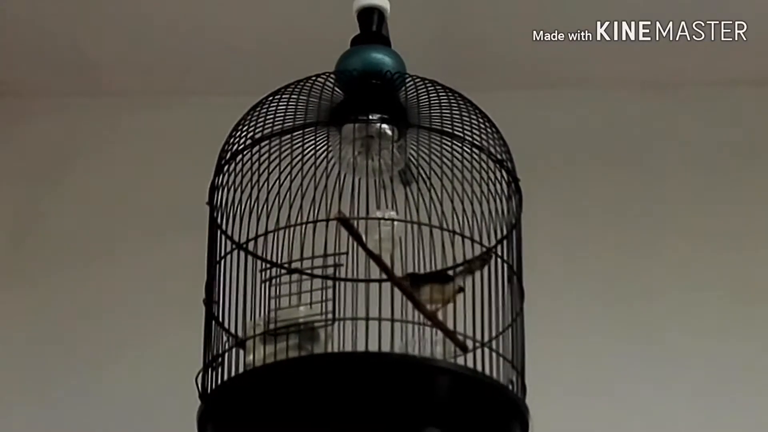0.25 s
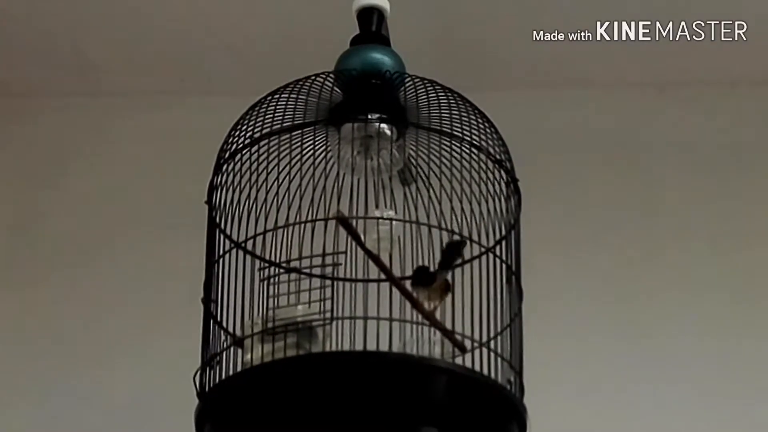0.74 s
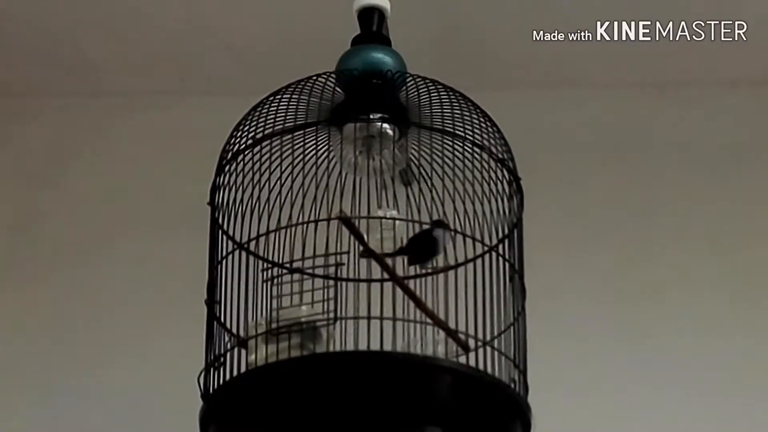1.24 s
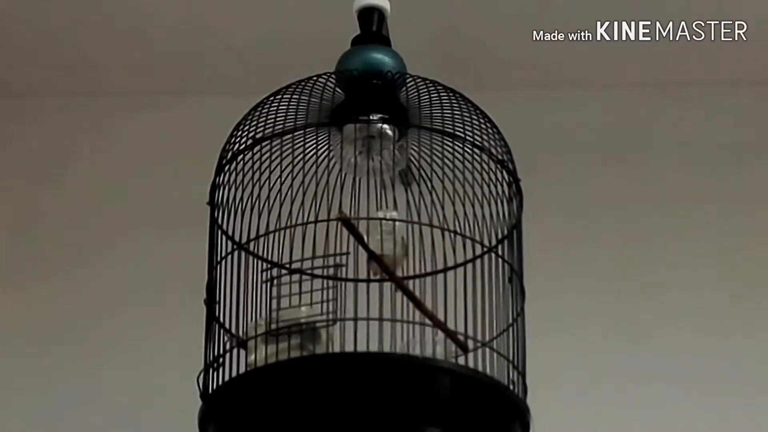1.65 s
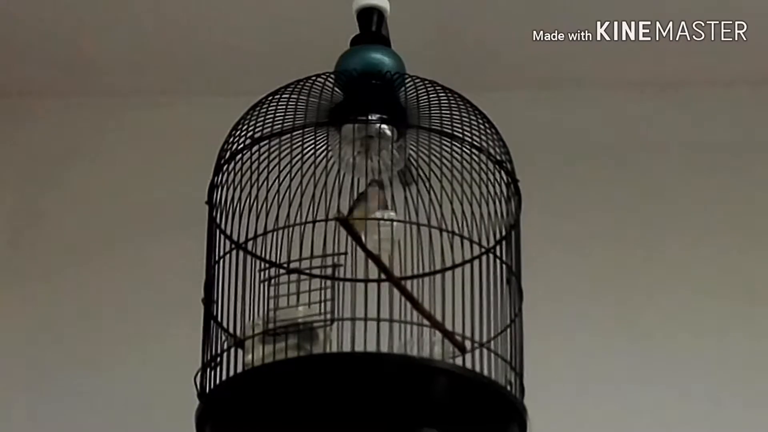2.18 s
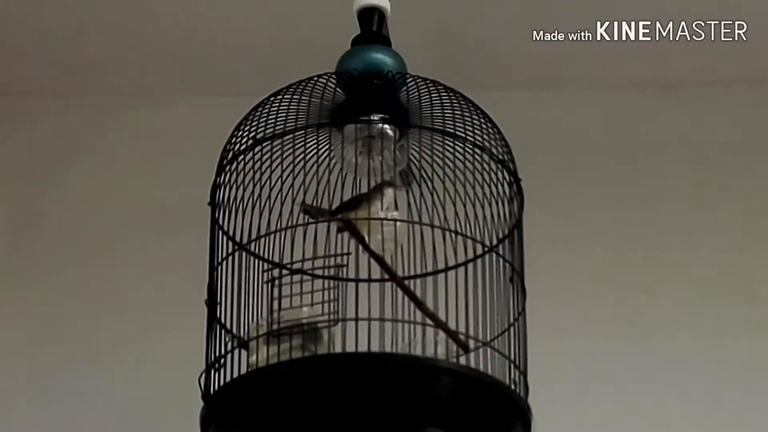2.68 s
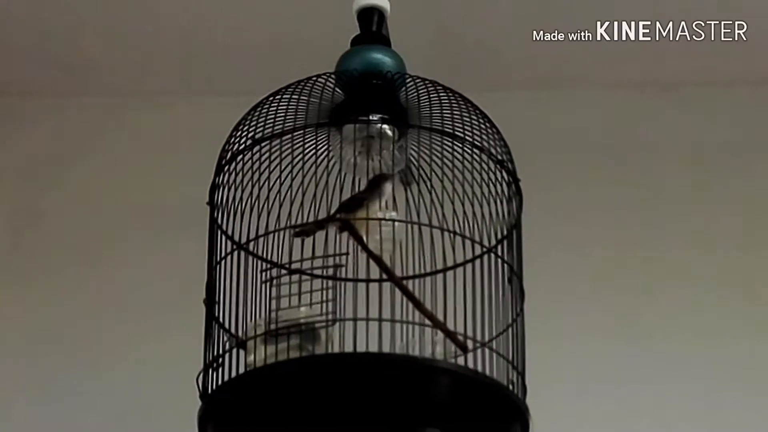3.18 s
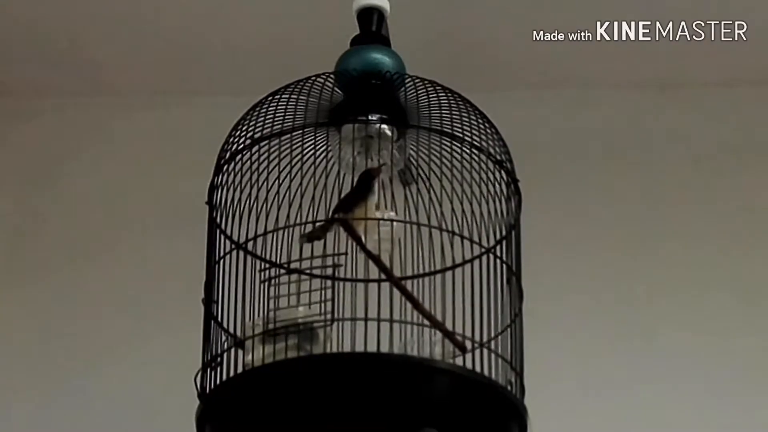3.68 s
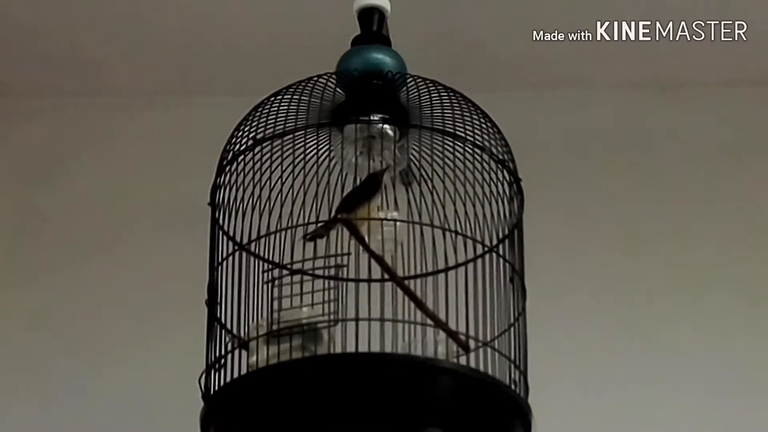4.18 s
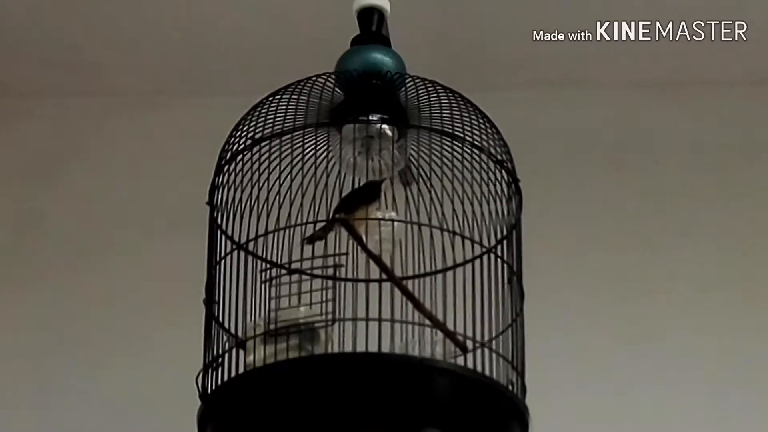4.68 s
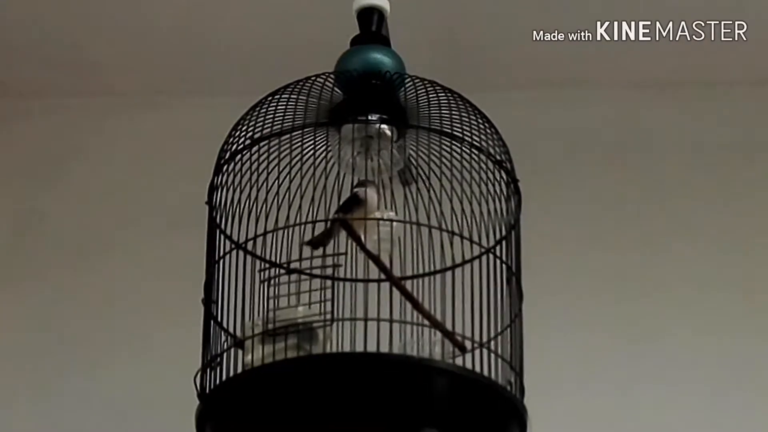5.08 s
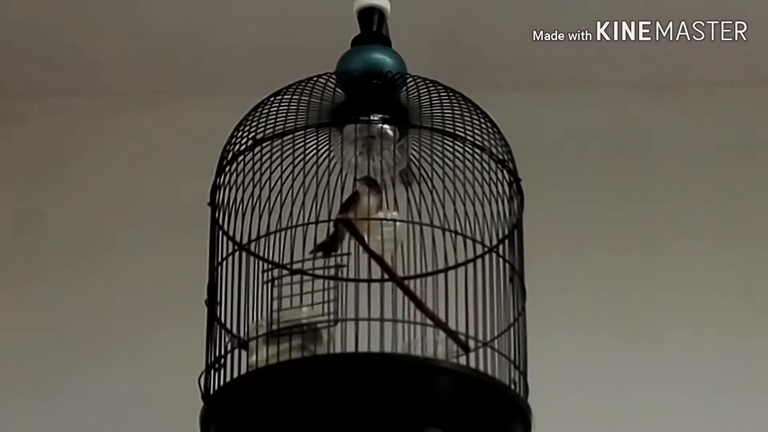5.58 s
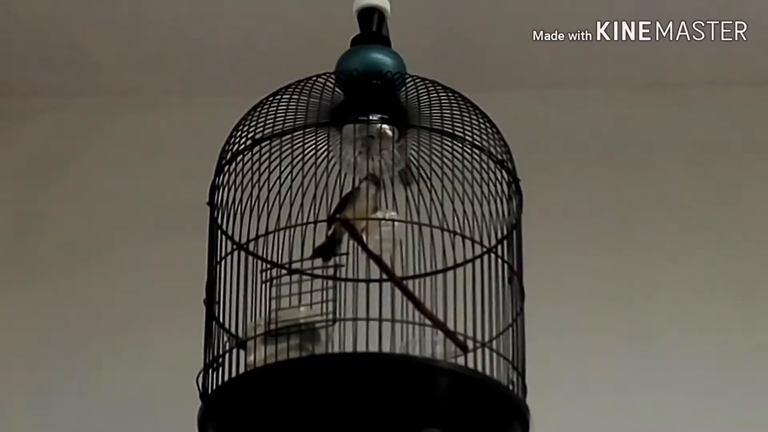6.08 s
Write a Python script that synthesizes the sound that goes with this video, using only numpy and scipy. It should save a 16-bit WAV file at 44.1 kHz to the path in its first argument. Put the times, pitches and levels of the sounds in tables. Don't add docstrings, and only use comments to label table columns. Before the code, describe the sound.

Piercing two-part bird whistles, overloaded and close, ring through a bare room over low rumble; distant falling chirps fill the pauses.

```python
import sys
import numpy as np
from scipy import signal
from scipy.fft import rfft, irfft, next_fast_len
from scipy.io import wavfile
from scipy.ndimage import uniform_filter1d, map_coordinates

SR = 44100
rng = np.random.default_rng(int(sys.argv[2]) if len(sys.argv) > 2 else 0)


def unload_wav(signal):
    wavfile.write(
        sys.argv[1],
        SR,
        np.round(np.clip(np.atleast_2d(signal).T, -1, 1) * 32767).astype(np.int16),
    )


def magnitude_from_level(level_db):
    exponent = np.asarray(level_db, float) / 20
    return 10 ** exponent


N = 279594
LEAD = SR // 10

# f/Hz, level/dB per Hz
RUMBLE_SPECTRUM = [(12, -52), (20, -31), (32, -35), (60, -4.5), (195, -7.5), (300, -7.5), (326, -14.5),
                   (536, -13.5), (1200, -25), (1560, -64.5), (2640, -120)]
# f/Hz, level/dB per Hz
HISS_SPECTRUM = [(350, -30), (600, -12), (900, -10.5), (1400, -8.5), (2500, -10.5), (3600, -7), (6200, -7),
                 (7500, -20), (9000, -19.5), (9600, -15), (10300, -23.5), (13000, -24.5), (15000, -25),
                 (15800, -26.5)]
# f/Hz, likeness/1
LIKENESS = [(60, 0.77), (180, 0.8), (550, 0.72), (1650, 0.36), (4970, 0.11), (15000, 0.97)]
# f/Hz, width/Hz, level/dB
DRONE_PEAKS = [(194, 15, -2.5), (304, 2, 0.5)]
# f/Hz, width/Hz, level/dB
INSECT_PEAKS = [(4600, 120, -3.5), (4200, 500, -7), (5900, 220, -12.5)]
# f/Hz, t60/s
ROOM_T60 = [(1000, 0.67), (2000, 0.29), (3000, 0.42), (4300, 0.29), (6000, 0.28), (10000, 0.18)]
# delay/s, level/dB
WALL_ECHOES = [(.0012, -7), (.0027, -2), (.0046, -5.5), (.0071, -6), (0.0092, -6.5), (0.015, -6.5)]
# f/Hz, level/dB, t60/s
WIRE_MODES = [(1020, -16.5, 0.18), (1504, 5.5, 0.07), (1582, -9, 0.98), (2230, -12, 0.12),
              (2420, -12.5, 0.55), (4474, -23, 0.44), (5700, -13, 0.48), (5750, -8.5, 0.17),
              (6700, -18, 0.32), (6800, -13.5, 0.17), (6970, -15, 0.21), (7160, -5, 0.15),
              (7260, -14, 0.14), (8791, -6, 0.096), (9060, -18.5, 0.11)]
# t/s, level/dB
HOP = (1.136, -38)
# t/s, peak level/dB
CLAW_TICKS = [
    (1.5975, -31),
    (5.6068, -25),
    (5.6325, -40),
]
# t/s, level/dB, start f/Hz, end f/Hz, length/s
DISTANT_PEEPS = [(0.134, -43.5, 1860, 1690, 0.027), (.18, -29.5, 1240, 1100, 0.0033),
                 (-.02, -43, 1460, 1490, 0.028), (.245, -49.5, 1410, 1480, 0.053),
                 (1.483, -59, 5770, 4300, 0.026), (1.63, -48.5, 1530, 1497, 0.092),
                 (1.703, -43, 1955, 1296, 0.036), (1.735, -45, 5140, 4070, 0.055),
                 (1.765, -44, 2830, 3718, 0.046), (4.296, -55, 1047, 1130, 0.044),
                 (4.49, -42.5, 6780, 6680, 0.062), (4.533, -57, 1324, 1235, .06),
                 (4.579, -54.5, 1830, 1813, 0.024), (5.05, -59, 1372, 1420, 0.059),
                 (5.95, -55.5, 1025, 1094, 0.046), (6.029, -47, 1890, 1790, 0.03)]
# t/s, start level/dB, end level/dB, end f/Hz, length/s
FAR_CALLS = [
    (-.045, -12, -16.5, 3232, 0.06),
    (1.863, -7, -27.5, 3086, 0.082),
    (2.188, -22.5, -14, 3240, 0.074),
    (5.339, -39.5, -32, 3210, 0.079),
    (5.665, -36.5, -22, 3270, 0.066),
    (5.963, -35.5, -21, 3210, 0.062),
]
# t/s, start level/dB, end level/dB, start f/Hz
FAR_REPLIES = [
    (2.057, -8.5, -37.5, 4474),
    (2.363, -25.5, -34, 4360),
    (5.206, -28, -42.5, 4600),
    (5.535, -20, -44, 4343),
    (5.821, -40.5, -35.5, 3464),
    (6.126, -43.5, -38, 3470),
]
# share of length/1, share of fall/1, level/dB
CALL_COURSE = [(0, .04, -8.5), (0.121, 0.055, 4.5), (0.24, .25, -1.5), (.37, 0.66, -1.5), (.5, .9, -6.5),
               (.62, 0.98, -4.5), (1, 0.95, -0.5)]
# share of length/1, share of fall/1, level/dB
REPLY_COURSE = [(0, 0, -12), (.25, .58, -7), (.33, .655, 0), (.62, .68, 0), (.72, .76, -8), (1, 1, -7)]
# t/s, level/dB, start f/Hz, end f/Hz, length/s
SONG_EXTRAS = [
    (.329, -18, 5050, 5000, .011),
    (6.208, -23, 2300, 1700, .035),
]
# t/s, fall level/dB, fall start f/Hz, rise delay/s, rise end f/Hz
SONG_NOTES = [
    (.340, 0.5, 5343, .072, 5920),
    (0.634, -0.5, 5596, 0.071, 5960),
    (2.431, 0.5, 5337, 0.072, 6390),
    (2.696, 0, 5700, 0.075, 6130),
    (2.958, 0.5, 5970, 0.075, 6100),
    (3.223, -0.5, 5764, 0.075, 5900),
    (3.495, -1, 6044, 0.068, 6120),
    (3.765, -0.5, 6040, 0.073, 6085),
    (6.167, -1.5, 4990, 0.081, 4880),
]
# f/Hz, level/dB
THROAT_GAIN = [(1700, -26.5), (2200, -19), (2700, -19.5), (3200, -7), (4000, -2), (4800, -0.5),
               (5500, -4.5), (6200, -11.5)]

RUMBLE_DB, HISS_DB = -46.5, -51
PRESS_DB_PER_S, RECOVER_DB_PER_S, HOLD_S, START_DB = 7.5, 6, 0.4, -6
GATE_DB, GATE_SHUTS_DB, GATE_SPAN_DB = 5.5, -4.5, 3
CALL_FROM_HZ, REPLY_TO_HZ, REPLY_S = 5840, 2120, .064
SAG_FROM_HZ, SAG_HZ_PER_S, DROP_HZ, DROP_S, FALL_S = 4520, 41000, 480.1, .0098, .068
RISE_FROM_HZ, RISE_TO_HZ, CLIMB_S, CLIMB_CURVE, REST_S = 2937, 6614, .042, 1.25, .0033
RISE_DB, RISE_FADE_DB = -9, 5.5


def unit(x):
    return x / np.sqrt(np.mean(x ** 2) + 1e-20)


def along(points, hz):
    f, value = np.transpose(points)
    return np.interp(np.log(hz + 1), np.log(f + 1), value)


def filtered(x, response):
    size = next_fast_len(N + SR // 2)
    return irfft(rfft(x, size) * response(np.fft.rfftfreq(size, 1 / SR)), size)[..., :N]


def resonant(x, peaks):
    def response(f):
        return sum(magnitude_from_level(db) * 1j * f * width / (c * c - f * f + 1j * f * width) for c, width, db in peaks)
    return unit(filtered(x, response))


def wobble(rate_hz):
    knots = rng.standard_normal(int(N * rate_hz / SR) + 4)
    return map_coordinates(knots, [np.arange(N) * rate_hz / SR])


def noise(spectrum):
    def mid_side(hz):
        turn = np.arccos(np.clip(along(LIKENESS, hz), -1, 1)) / 2
        return magnitude_from_level(along(spectrum, hz)) * [np.cos(turn), np.sin(turn)]
    mid, side = filtered(rng.standard_normal((2, N)), mid_side)
    return unit(np.array([mid + side, mid - side]))


def echoes(lumpy_db):
    hz, t, z = signal.stft(rng.standard_normal((2, 3 * SR // 4)), SR, nperseg=512)
    modes_db = lumpy_db * rng.standard_normal((len(hz), 1)) * np.minimum(t / .039, 1)
    fall_db = 60 * t / along(ROOM_T60, hz)[:, None]
    decay = np.hypot(magnitude_from_level(-fall_db), magnitude_from_level(-24.5 - .52 * fall_db))
    tail = signal.istft(z * magnitude_from_level(modes_db) * decay, SR, nperseg=512)[1]
    tail *= 1 - np.exp(-np.arange(tail.shape[1]) / (.0067 * SR))
    return tail / np.sqrt(np.mean(np.sum(tail ** 2, axis=1)))


def add(out, s, sound, tail, wet_db, lag, pan_db):
    path = magnitude_from_level(wet_db) * tail
    delay_s, db = np.transpose(WALL_ECHOES)
    arrive = np.round(delay_s * SR * rng.uniform(.85, 1.15, len(db))).astype(int)
    size = magnitude_from_level(db) * rng.choice([-1, 1], len(db))
    path[0, arrive] += size
    path[1, arrive + rng.integers(-2, 3, len(db))] += size
    path[0, max(lag, 0)] += 1
    path[1, max(-lag, 0)] += 1
    heard = signal.fftconvolve(sound[None], path, axes=1) * magnitude_from_level([[pan_db / 2], [-pan_db / 2]])
    spot = out[:, LEAD + round(s * SR):][:, :heard.shape[1]]
    spot += heard[:, :spot.shape[1]]


def whistle(hz, db, edge_s):
    t = np.arange(len(hz)) / SR
    knots_s = np.arange(0, .1, .004)
    strength, tension = (np.interp(t, knots_s, row) for row in rng.standard_normal((2, len(knots_s))))
    phase = 2 * np.pi * np.cumsum(hz * (1 + .008 * tension)) / SR
    shape = np.sin(np.pi / 2 * np.clip(np.minimum(t, t[-1] - t) / edge_s, 0, 1)) ** 2
    octave_db = -29 - 11 * np.maximum(hz - 3600, -300) / 1000
    return magnitude_from_level(db + 2.2 * strength) * shape * (np.sin(phase) + magnitude_from_level(octave_db) * np.sin(2 * phase))


def gain_control_db():
    t = np.arange(N) / SR
    loud = sum((t > note[0]) & (t < note[0] + HOLD_S) for note in SONG_NOTES) > 0
    drift_db = START_DB + np.cumsum(np.where(loud, -PRESS_DB_PER_S, RECOVER_DB_PER_S)) / SR
    return drift_db - np.maximum(np.maximum.accumulate(drift_db), 0)


def insect():
    strokes = np.arange(N) / SR * 30 + .4 * wobble(2)
    scrape = (.3 + np.exp(-(strokes % 1) / .2)) * magnitude_from_level(3 * wobble(1.5))
    trill = resonant(scrape * rng.standard_normal((2, N)), INSECT_PEAKS)
    return magnitude_from_level(-59.5) * resonant(trill, [(4900, 2500, 0)])


def background():
    gain_db = gain_control_db()
    rumble = magnitude_from_level(RUMBLE_DB + gain_db + 1.3 * wobble(9.3)) * noise(RUMBLE_SPECTRUM)
    shut = np.clip((GATE_SHUTS_DB - gain_db) / GATE_SPAN_DB, 0, 1)
    hiss = magnitude_from_level(HISS_DB - GATE_DB * shut) * noise(HISS_SPECTRUM)
    drone = magnitude_from_level(-60) * resonant(rng.standard_normal(N), DRONE_PEAKS)
    return rumble + hiss + drone + insect()


def cage(out):
    t = np.arange(SR // 2) / SR
    ring = np.zeros(len(t))
    for hz, db, t60_s in WIRE_MODES:
        waver = magnitude_from_level(5 * wobble(60)[:len(t)])
        ring += waver * magnitude_from_level(db - 60 * t / t60_s) * np.sin(2 * np.pi * hz * t)
    hop_s, hop_db = HOP
    ring *= magnitude_from_level(hop_db - 7.5) * (1 - np.exp(-t / .0017))
    add(out, hop_s, ring, echoes(lumpy_db=0), wet_db=14.5, lag=6, pan_db=0)
    t = t[:SR // 100]
    for s, db in CLAW_TICKS:
        tick = magnitude_from_level(db + 4 - 60 * t / .002) * np.sin(2 * np.pi * 5200 * t) * np.minimum(t / .0001, 1)
        out[:, LEAD + round(s * SR):][:, :len(t)] += tick


def calls(out, events, course, wet_db):
    share, fall, dip_db = np.transpose(course)
    for s, start_db, end_db, start_hz, end_hz, length_s in events:
        u = np.arange(round(length_s * SR)) / (length_s * SR)
        done = np.interp(u, share, fall)
        db = start_db + (end_db - start_db) * done + np.interp(u, share, dip_db)
        sound = whistle(start_hz + (end_hz - start_hz) * done, db - wet_db, edge_s=.0025)
        add(out, s, sound, echoes(lumpy_db=3.5), wet_db, lag=12, pan_db=0)


def level_calls(out, events, wet_db):
    calls(out, [(s, db, db, *shape) for s, db, *shape in events], CALL_COURSE, wet_db)


def far_bird(out):
    first = [(*row[:3], CALL_FROM_HZ, *row[3:]) for row in FAR_CALLS]
    calls(out, first, CALL_COURSE, wet_db=13.5)
    second = [(*row, REPLY_TO_HZ, REPLY_S) for row in FAR_REPLIES]
    calls(out, second, REPLY_COURSE, wet_db=17)


def singer(out):
    perch = echoes(lumpy_db=6)
    t = np.arange(-.012, FALL_S, 1 / SR)
    fall_hz = SAG_FROM_HZ - SAG_HZ_PER_S * t + DROP_HZ * np.exp(-t / DROP_S)
    climb = np.arange(0, CLIMB_S, 1 / SR) / CLIMB_S
    rise_hz = RISE_FROM_HZ + (RISE_TO_HZ - RISE_FROM_HZ) * climb ** CLIMB_CURVE
    for s, fall_db, top_hz, wait_s, end_hz in SONG_NOTES:
        tail = .81 * perch + .7 * echoes(lumpy_db=.5)
        hz = fall_hz[fall_hz <= top_hz]
        fall = whistle(hz, fall_db - 3.9 + along(THROAT_GAIN, hz), edge_s=.002)
        add(out, s + t[-len(hz)], fall, tail, wet_db=7.5, lag=-1, pan_db=.7)
        hz = np.pad(rise_hz[rise_hz <= end_hz], (0, round(REST_S * SR)), mode="edge")
        breath_db = RISE_DB + RISE_FADE_DB * np.linspace(.5, -.5, len(hz))
        rise = whistle(hz, breath_db + along(THROAT_GAIN, hz), edge_s=.005)
        add(out, s + wait_s, rise, tail, wet_db=9.5, lag=-1, pan_db=.7)


def scene():
    out = np.zeros((2, LEAD + N))
    floor = background()
    level_calls(out, DISTANT_PEEPS, wet_db=15)
    cage(out)
    far_bird(out)
    level_calls(out, SONG_EXTRAS, wet_db=6)
    singer(out)
    return out[:, LEAD:] + floor


def masked(x, depth_db, low_hz):
    hz, _, z = signal.stft(x, SR, nperseg=1024)
    hz = hz[:, None]
    band = np.sqrt(np.abs(uniform_filter1d(np.abs(z) ** 2, size=14, axis=1)))
    reach = magnitude_from_level(-depth_db - 2.2 * (hz - low_hz) / 1000)
    keep = (band > reach * band.max(axis=1, keepdims=True)) | (hz < low_hz)
    return signal.istft(z * keep, SR, nperseg=1024)[1][:, :N]


def low_pass(x):
    return signal.sosfilt(signal.butter(12, 15870, fs=SR, output="sos"), x)


def record(dry):
    clipped = dry / (1 + np.abs(dry / .97) ** 14) ** (1 / 14)
    thinned = masked(clipped, depth_db=40, low_hz=6400)
    limited = filtered(thinned, lambda hz: np.where(hz < 15800, 1, magnitude_from_level(-30.5)))
    return low_pass(np.clip(limited, -1, 1))


dry = scene()
out = record(dry)
unload_wav(out)
```